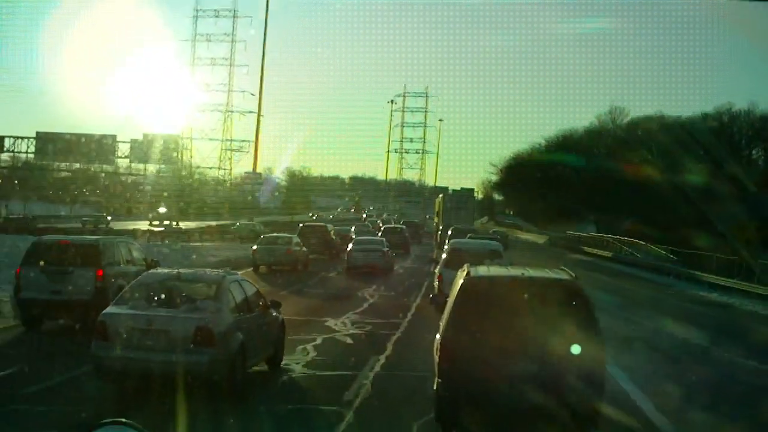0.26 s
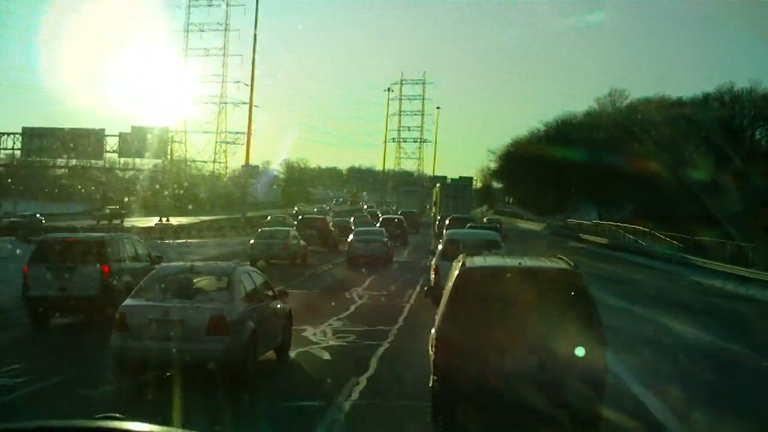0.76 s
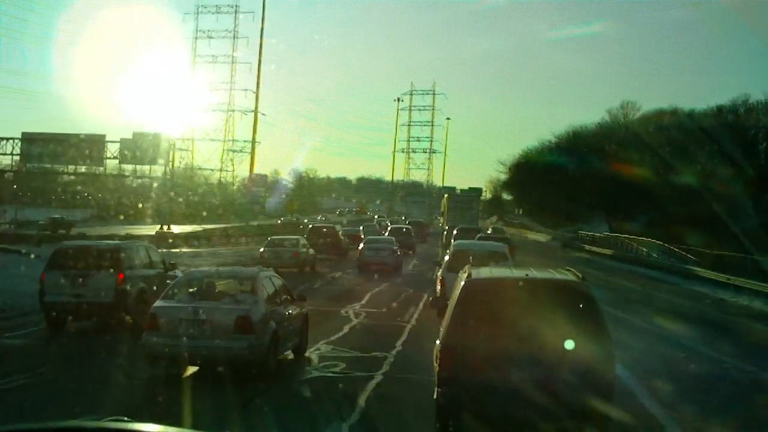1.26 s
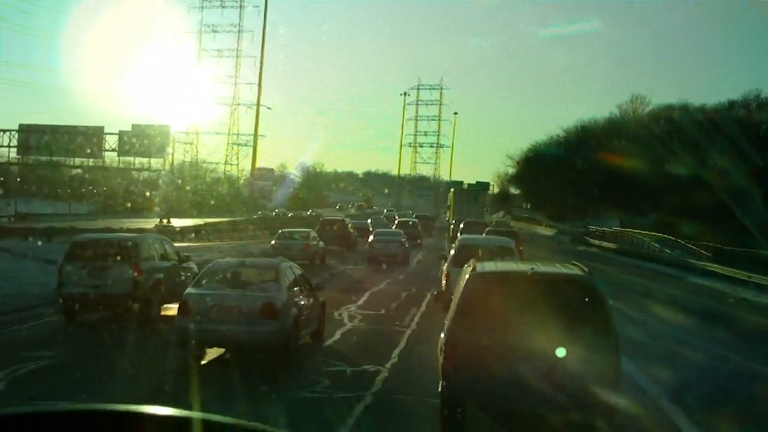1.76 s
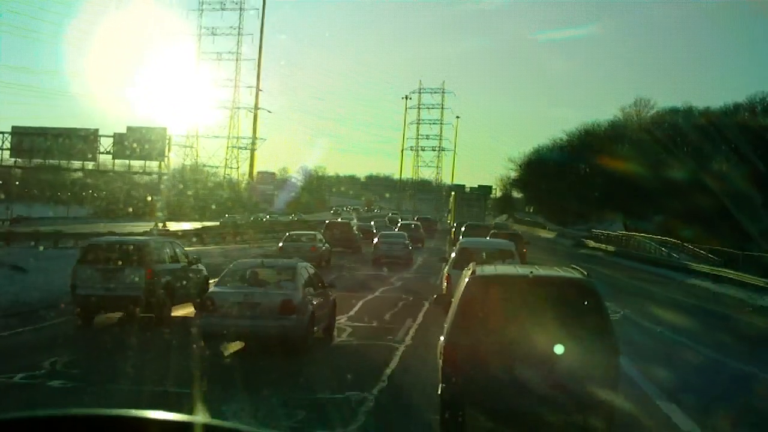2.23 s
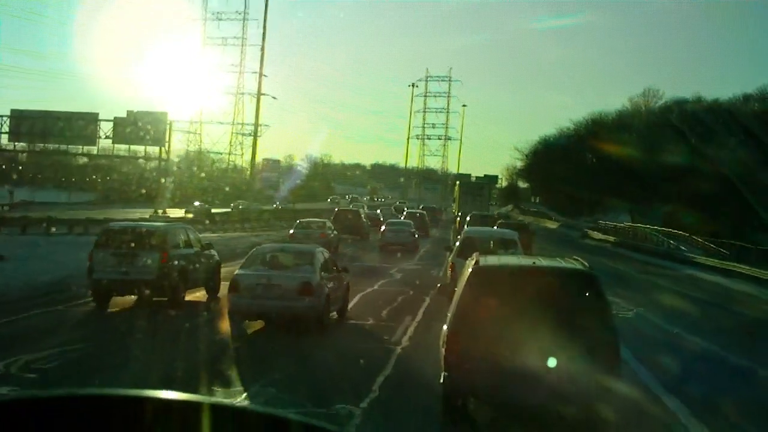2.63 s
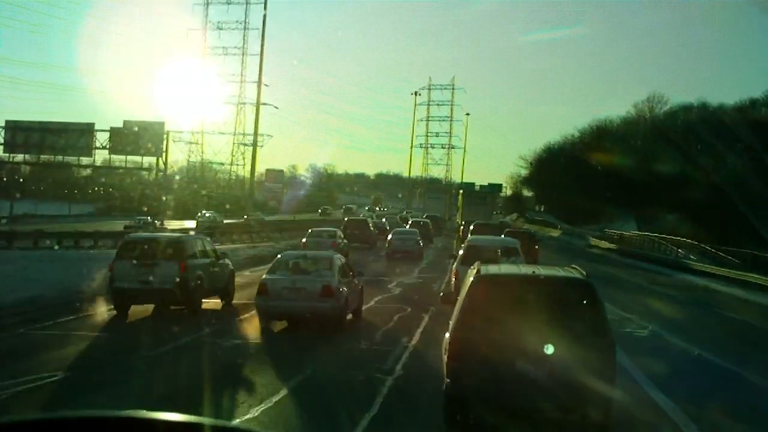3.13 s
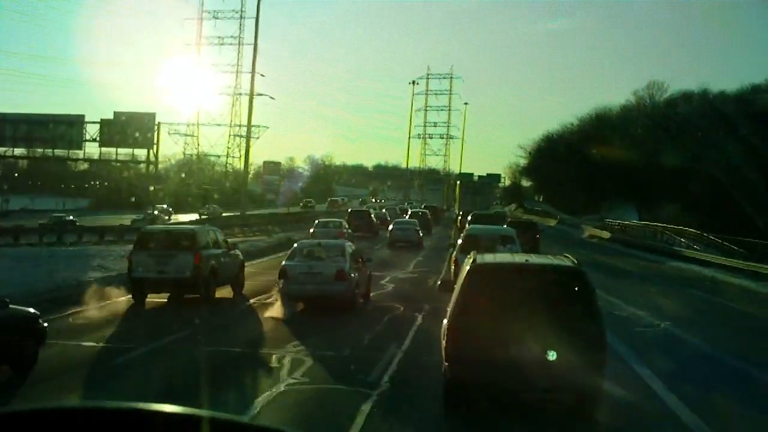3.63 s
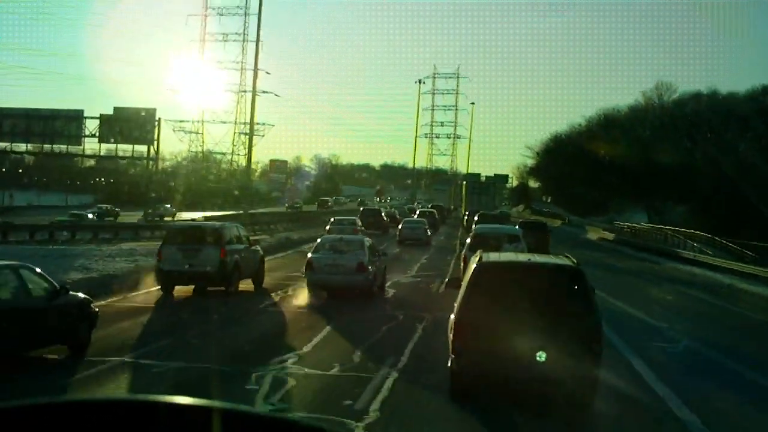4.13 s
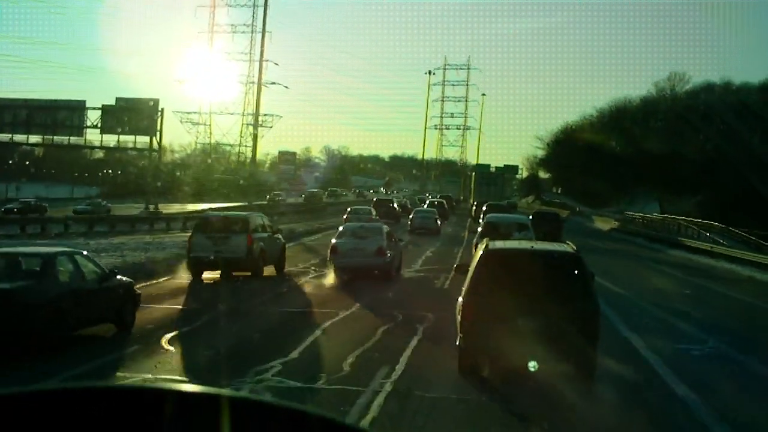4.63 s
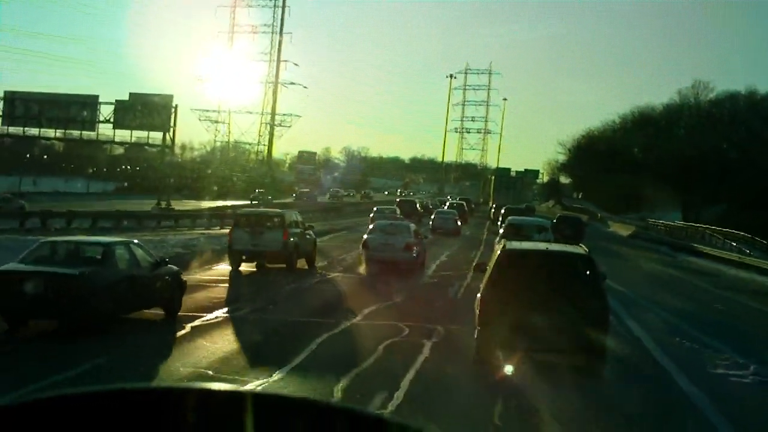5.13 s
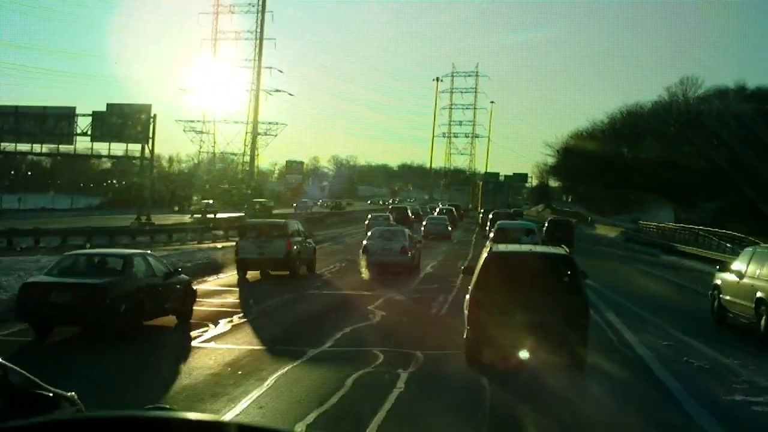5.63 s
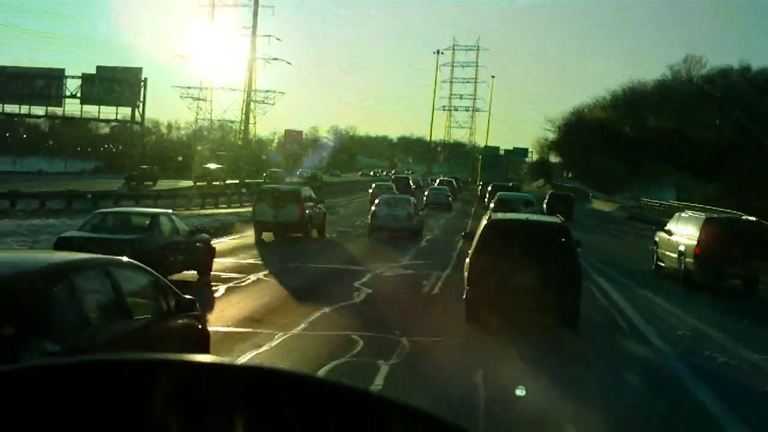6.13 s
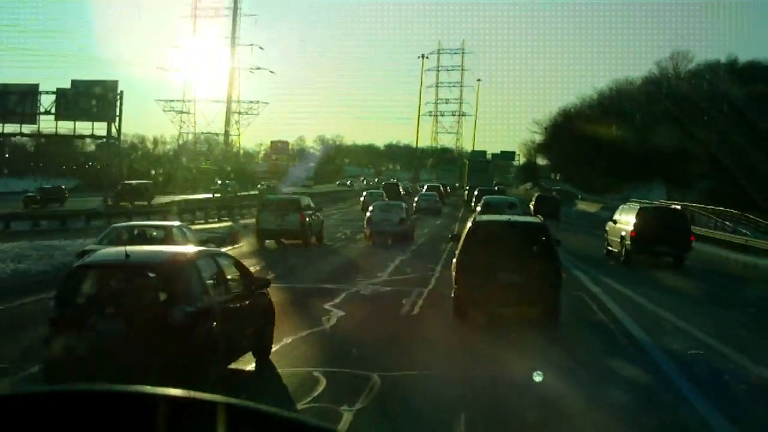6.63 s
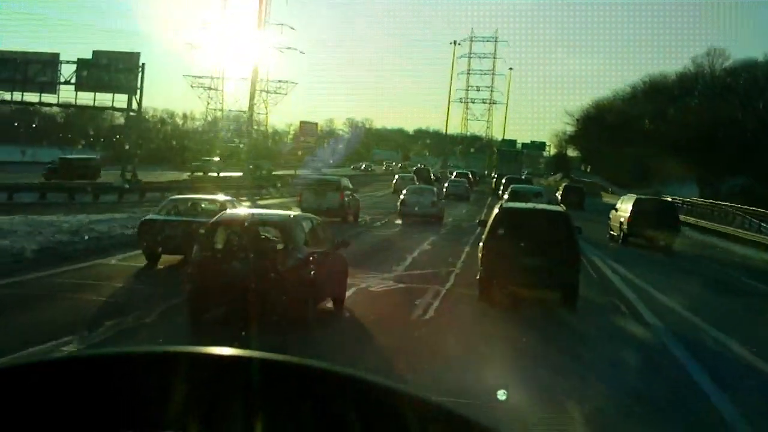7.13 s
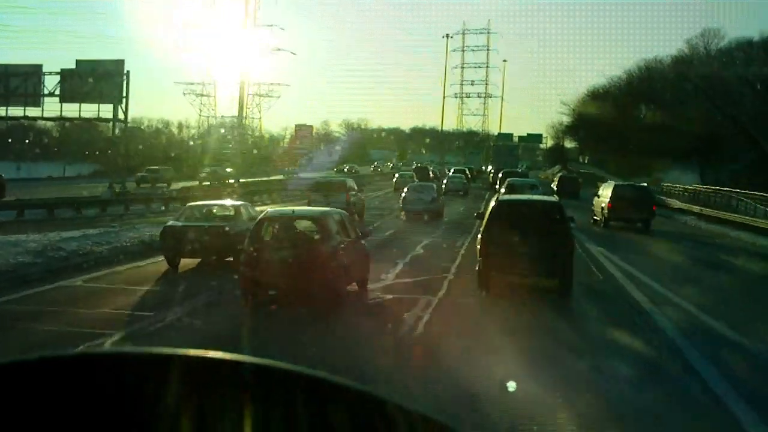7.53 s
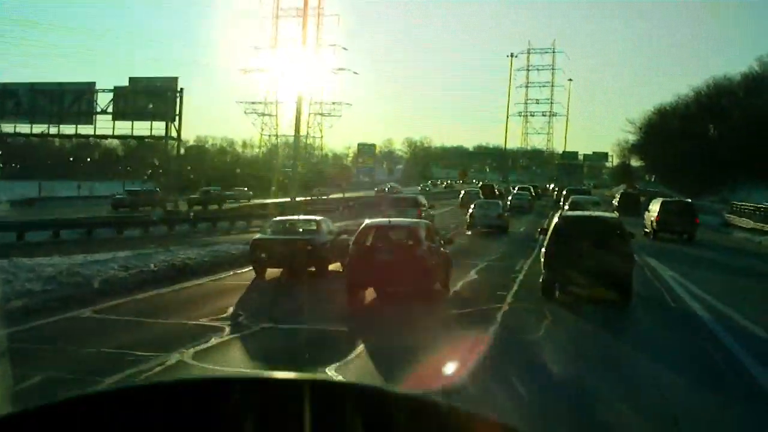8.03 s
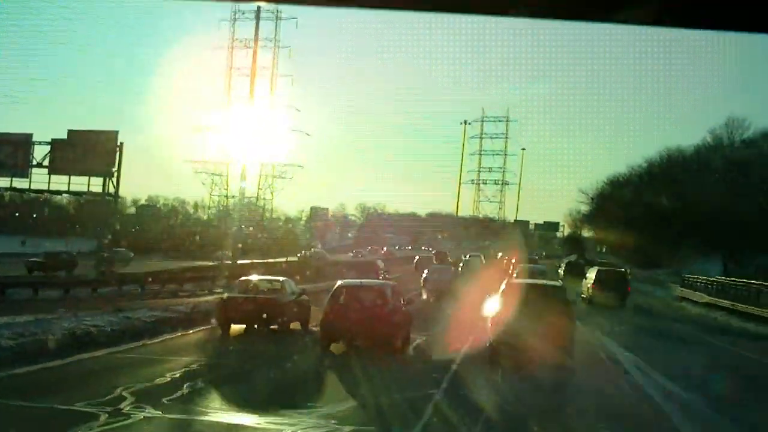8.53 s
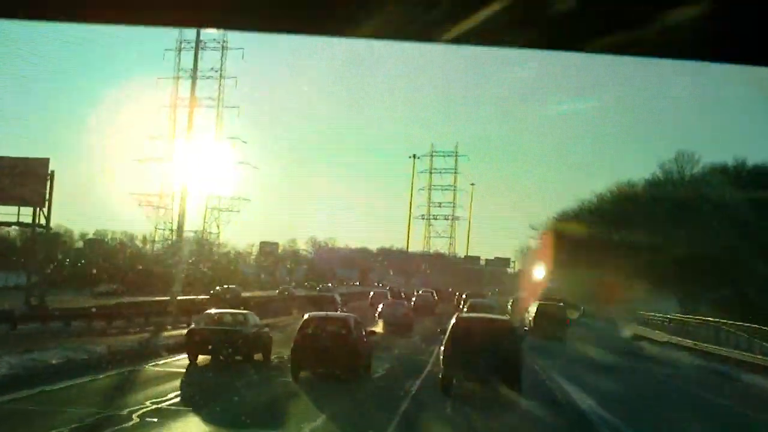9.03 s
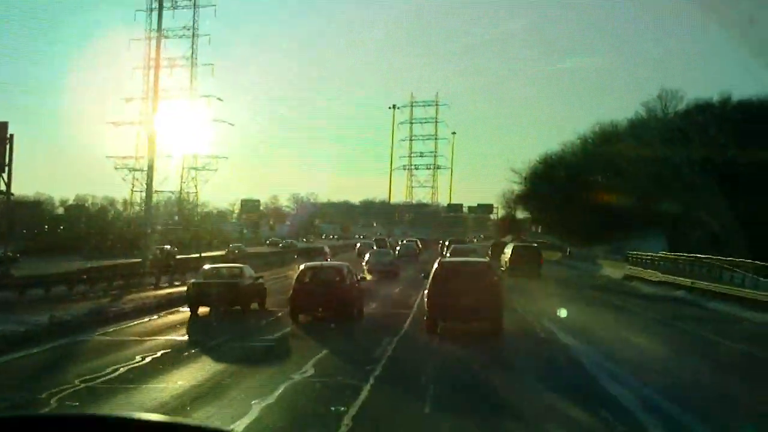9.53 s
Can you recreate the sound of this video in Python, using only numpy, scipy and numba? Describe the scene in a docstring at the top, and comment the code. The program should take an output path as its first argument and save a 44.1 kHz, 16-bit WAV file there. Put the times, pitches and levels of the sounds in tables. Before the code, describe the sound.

A heavy engine drones and clatters from within the cab, its pitch sagging for three seconds before surging up under load with a brief sizzle. It holds, drops back, then growls upward again in two pulls. Deep tyre rumble and cab shake underlie everything; small buzzes and ticks fizz on top, and bass peaks make the microphone choke and crackle.

```python
"""Inside the cab of a truck in slow highway traffic: the engine coasts down, pulls away, eases off and pulls again.
Pure tones locked to the crankshaft boom in the cab. Pulses and noise, shaped by spectra and narrow peaks, make
the exhaust drone and the clatter of the block; filtered noise makes the rumbling tyres, ticks, buzz and sizzle.
A gear whines briefly. The bass swings so far that the microphone blocks on its peaks and crackles."""
import sys
import numpy as np
from scipy import signal
from scipy.fft import rfft, irfft, next_fast_len
from scipy.io import wavfile
from numba import njit

SR = 44100
rng = np.random.default_rng(int(sys.argv[2]) if len(sys.argv) > 2 else 0)


def int16_out(signal):
    """Quantize to a 16-bit WAV file."""
    q = np.round(np.clip(np.atleast_2d(signal).T, -1, 1) * 32767)
    wavfile.write(sys.argv[1], SR, q.astype(np.int16))


N = 430857
TIME = np.arange(N) / SR

# Levels in the tables are relative: trims and slow random changes in the functions come on top.
# Tyre rumble, louder as the truck gathers speed. Each row: time in seconds, level in dB.
ROAD_LEVEL = [(0, -24.5), (1.8, -23.5), (2.7, -31), (3.6, -19), (5, -23), (6.3, -22.5), (7.1, -16),
              (8.2, -18.5), (9.77, -18.5)]
# Smooth spectra of the tyres, the exhaust drone, the block's clatter and the dry ticks.
# Each row: frequency in Hz, level in dB per Hz.
RUMBLE_SPECTRUM = [(12, -22.5), (22, -8.5), (45, -7.5), (70, -1), (92, -1.5), (125, -5), (170, -15.5),
                   (300, -31.5), (700, -42.5)]
DRONE_SPECTRUM = [(40, -10.5), (90, -3.5), (170, 0), (240, 1), (300, 2), (350, 0), (400, 2), (480, -5.5),
                  (600, -11.5), (900, -13), (2000, -34)]
CLATTER_SPECTRUM = [(200, -20.5), (450, -2.5), (700, -5), (1050, -8.5), (1250, -13.5), (1600, -14),
                    (2200, -19.5), (3200, -25), (4500, -30), (6000, -37), (8000, -34), (10000, -33.5),
                    (12300, -26.5), (15500, -38)]
TICK_SPECTRUM = [(1500, -8), (2700, -2), (4000, -4), (6000, -16.5), (8000, -14.5), (10000, -19),
                 (14000, -34)]
# Narrow peaks in the clatter and in the hiss that rises and falls with it, then those of the ticks.
# Each row: frequency in Hz, width in Hz, height above the smooth spectrum in dB.
CLATTER_PEAKS = [(765, 26, 7), (808.5, 58.5, 11), (906, 39, 7.5), (992, 80, 4.5), (1600, 94, 2.5),
                 (4380, 72, 6.5), (4700, 77, 8.5), (5110, 230, 7.5), (6880, 120, 9.5), (7340, 150, 6.5),
                 (11150, 134, 13.5), (12060, 110, 6), (12400, 250, 1.5), (13000, 320, 5)]
TICK_PEAKS = [(4060, 310, 5.5), (7900, 510, 8.5)]
# The cylinders in firing order. Each row: strength in dB, delay in the exhaust pipe in seconds.
CYLINDERS = [(4.5, 0.00027), (-7.5, .0014), (1.5, 0.00044), (-7.5, .0018), (4.5, 0.00038), (-5, .0022),
             (1, .0013), (3, 0.000094)]
# Speed of the crankshaft. Each row: time in seconds, turns per second.
CRANK_SPEED = [(0, 30.6), (.3, 31), (.9, 27.9), (1.25, 27.1), (1.75, 25.1), (2.35, 21.2), (2.8, 17.1),
               (3.1, 18), (3.55, 31), (3.75, 36.4), (3.95, 38.2), (4.25, 35.7), (4.8, 38.3), (5.4, 40.8),
               (6.0, 34.6), (6.58, 28.8), (6.9, 32.7), (7.2, 30.2), (7.5, 33.6), (7.9, 35.1), (8.3, 39.8),
               (8.55, 38), (8.87, 42.5), (9.77, 37.8)]
# How hard the engine shakes the cab, about once a turn. Each row: time in seconds, level in dB.
SHAKE_LEVEL = [(0, -22.5), (.55, -22), (.72, -32), (.95, -20.5), (1.13, -31), (1.4, -20), (1.9, -31.5),
               (2.35, -28.5), (3.0, -35.5), (3.9, -20.5), (4.25, -27), (4.9, -24), (6.3, -20.5), (7.2, -32),
               (7.7, -20), (8.55, -20), (9.0, -32), (9.77, -24)]
# Dry ticks while the engine coasts. Each row: time in seconds, strength in dB.
TICK_TIMES = [(0.0862, -33), (0.115, -29.5), (0.16, -29), (0.2309, -30), (0.4309, -30), (0.503, -29),
              (0.5681, -37), (0.8719, -26), (0.923, -37), (0.964, -33), (1.0076, -29), (1.2451, -32),
              (1.284, -28), (1.3657, -30), (1.403, -31), (1.444, -32), (1.5254, -44), (1.604, -35),
              (1.6667, -27.5), (1.705, -26.5), (1.7444, -30), (1.792, -32), (1.9634, -34), (2.0055, -32),
              (2.0343, -35), (2.0928, -30), (2.1224, -31.5), (2.2828, -37), (2.4203, -30.5), (2.5486, -36),
              (2.745, -31), (2.799, -30), (2.8594, -33), (2.9292, -30.5)]
# Presses of the pedal. Each row: start in seconds, end in seconds, release in seconds,
# clatter lift in dB, drone lift in dB.
PEDAL_PRESSES = [(3.033, 3.396, 0.082, 7, 4), (3.536, 3.8, 0.34, 4.5, 1.5), (3.907, 5.537, 0.4, 6, 3.2),
                 (6.534, 7.051, 0.67, 6.5, 6), (7.388, 9.28, 0.5, 4.5, 6.5)]
# Brief surges and lulls of the engine's noise.
# Each row: centre in seconds, length in seconds, clatter change in dB, drone change in dB.
SURGES = [(0.28, 0.056, 2.5, 5.5), (0.792, 0.093, 1.5, 1), (1.593, 0.15, 4.5, 5), (2.38, .11, 4, 6.5),
          (3.2, 0.11, 3.5, 1.5), (3.52, 0.046, -6, -13), (3.558, 0.062, 11.5, 15), (3.697, 0.017, 7.5, 6),
          (3.77, .06, 2, 0), (4.348, .35, 2.5, -0.5), (4.714, 0.35, 0, 3), (5.167, 0.23, 0.5, 2.5),
          (6.712, 0.052, 3, -4.5), (6.923, 0.029, 1, 5), (7.55, 0.3, 2, 0), (7.706, 0.11, -1, -2.5),
          (8.207, 0.075, 2.5, 7.5), (8.329, 0.045, -5, -2), (8.452, 0.14, 2, 3), (8.923, 0.058, -5, -4),
          (9.262, 0.07, 2, 1.5)]
# Tones that boom in the cab. Each row: order in cycles per crankshaft turn, level while coasting in dB,
# share of the pedal's drone lift.
BOOM_ORDERS = [(2, -31.5, 0.38), (3, -32, 1), (4, -33, .8), (5, -38.5, 1.0), (6, -42.5, 0.99)]
# Moments when one of these tones swells. Each row: centre in seconds, length in seconds,
# order in cycles per turn, lift in dB.
BOOM_SWELLS = [(0.808, .4, 3, 8.5), (1.62, 0.48, 4, 6.5), (1.902, 0.51, 2, 6.5), (1.85, 0.49, 5, 5),
               (2.373, .15, 4, 8.5), (2.92, 0.2, 2, 9.5), (3.359, 0.19, 4, 8), (3.61, 0.13, 3, 8),
               (3.781, 0.12, 4, 17.5), (4.503, 0.7, 4, 9.5), (5.15, .5, 4, 3.5), (5.19, 0.48, 5, 10),
               (5.45, .9, 3, 4), (5.1, .7, 6, 4.5), (6.838, 0.32, 4, 4), (7.106, 0.79, 2, 13),
               (7.595, 0.66, 3, 5), (7.746, .45, 6, 10.5), (8.219, .3, 6, 7), (8.25, 0.35, 4, 3.5),
               (8.698, 0.14, 5, 7.5), (8.926, 0.49, 2, 13), (8.95, .7, 5, 4), (9.12, 0.35, 3, 4)]
# Higher tones that growl under load. Each row: order in cycles per turn, level in dB.
GROWL_ORDERS = [(4.5, -9.5), (5.5, -14), (6.5, -13.5), (7, -7.5), (8, -13), (10, -12.5), (10.5, -13)]
# How the cab responds to an engine tone. Each row: frequency in Hz, gain in dB.
CAB_GAIN = [(35, -3.5), (55, -1), (75, -4), (86, 0), (102, 2), (122, -1.5), (146, -1), (165, -5), (205, 1),
            (245, -1), (330, -4), (385, 2.5), (430, -8)]
# Thin sizzle as the engine takes up the load. Each row: centre in seconds, length in seconds, level in dB.
SPURTS = [(3.18, 0.16, -49), (3.626, 0.22, -48.5)]
# A thin, faint squeal, perhaps the brakes. Each row: centre in seconds, length in seconds, level in dB.
SQUEALS = [(.75, .3, -61.5), (5.8, 0.45, -58)]

# With the pedal up and no surge, engine speed alone sets the basic levels of clatter and drone.
COAST_TURNS_PER_S, COAST_CLATTER_DB, COAST_DRONE_DB = 33.6, -36, -33.5
CLATTER_DB_PER_OCTAVE, DRONE_DB_PER_OCTAVE = 5, 4.5
PRESS_ATTACK_S = 0.098
# Growl against the drone with the pedal up, and the share of the clatter lift added to it.
GROWL_COAST_DB, GROWL_SHARE = -2.5, .65
# The whine's pitch at the start and its steady fall, its level, and its fade.
WHINE_HZ, WHINE_SAG_HZ_PER_S, WHINE_DB = 967, 145, -45.5
WHINE_FADE_START_S, WHINE_FADE_S = 0.88, 0.52
# Buzz with the pedal up at a given shake level, and dB gained per dB of shake.
BUZZ_DB, BUZZ_AT_SHAKE_DB, BUZZ_GROWTH = -47.5, -20, 1.0
SPURT_FLICKER_DB = 3
MIC_CORNER_HZ, CUTOFF_HZ = 200, 15800


def from_db(db):
    """Turn decibels into a plain gain."""
    return 10 ** (np.asarray(db) / 20)


def rms_one(x):
    """Scale a sound to an average (rms) level of 1."""
    return x / np.sqrt(np.mean(x ** 2) + 1e-20)


def in_time(rows):
    """Join the points of a curve with straight lines, one value per sample."""
    times, values = np.transpose(rows)
    return np.interp(TIME, times, values)


def noise():
    """White noise: all pitches equally strong."""
    return rng.standard_normal(N)


def drift(rate_hz):
    """Slow random wandering, drawn every few samples and joined up."""
    step, size = 40, 16384
    hz = np.arange(size // 2 + 1) * SR / step / size
    smoothing = 1 / (1 + (hz / rate_hz) ** 2) ** 2
    slow = irfft(rfft(rng.standard_normal(size)) * smoothing, size)
    return np.interp(np.arange(N) / step, np.arange(size), rms_one(slow))


def bump(centre_s, length_s):
    """A smooth rise and fall of height 1, length_s wide at half height."""
    return np.exp2(-np.minimum((2 * (TIME - centre_s) / length_s) ** 2, 60))


def colour(x, spectrum, peaks=()):
    """Give a sound a smooth spectrum with narrow peaks on top, at rms 1."""
    size = next_fast_len(N + 8192)
    hz = np.maximum(np.arange(size // 2 + 1) * SR / size, 1)
    points, levels = np.transpose(spectrum)
    db = np.interp(np.log(hz), np.log(points), levels)
    for centre, width, lift in peaks:
        db = db + lift / (1 + (2 * (hz - centre) / width) ** 2)
    # Fade out beyond both ends of the spectrum.
    ends = np.minimum(hz / points[0], 1) * np.minimum(points[-1] / hz, 1)
    return rms_one(irfft(rfft(x, size) * from_db(db) * ends ** 2, size)[:N])


def resonate(x, hz, width_hz):
    """Ring one resonance, with gain 1 at its peak."""
    r = np.exp(-np.pi * width_hz / SR)
    feedback = [1, -2 * r * np.cos(2 * np.pi * hz / SR), r * r]
    return signal.lfilter(np.array([1, 0, -1]) * (1 - r * r) / 2, feedback, x)


def resonate_twice(x, hz, width_hz):
    """Pass a sound through the same resonance twice, for a narrower band."""
    return resonate(resonate(x, hz, width_hz), hz, width_hz)


def die_away(hits, decay_s):
    """Turn each hit into a level that falls off exponentially."""
    return signal.lfilter([1], [1, -np.exp(-1 / (decay_s * SR))], hits)


def tone(turns, order, db):
    """A sine with order cycles per turn, at the given rms level."""
    return from_db(db) * np.sqrt(2) * np.sin(2 * np.pi * (order * turns + rng.random()))


def cab_response(hz):
    """Gain of the cab in dB for a tone of this pitch: its resonances favour some pitches."""
    points, db = np.transpose(CAB_GAIN)
    return np.interp(np.log(hz), np.log(points), db)


def heave():
    """The cab's air heaves on the springs: slow random pressure."""
    return from_db(-43) * drift(20)


def tyre_rumble():
    """Tyres on the road: noise with a low spectrum that follows the road level."""
    return from_db(in_time(ROAD_LEVEL) - 4.5) * colour(noise(), RUMBLE_SPECTRUM)


def sizzle(spurts, low_hz, high_hz, width_hz, high_db):
    """Noise in two narrow resonances, coming in flickering spurts."""
    level = sum(from_db(db) * bump(centre_s, length_s) for centre_s, length_s, db in spurts)
    flicker = from_db(SPURT_FLICKER_DB * drift(34))
    air = noise()
    low = resonate_twice(air, low_hz, width_hz)
    high = resonate_twice(air, high_hz, width_hz)
    return level * flicker * rms_one(low + from_db(high_db) * high)


def ticks(decay_s, level_db):
    """Each dry tick is a fizz of noise that dies away within milliseconds."""
    times, db = np.transpose(TICK_TIMES)
    hits = np.zeros(N)
    hits[np.clip((times * SR).astype(int), 0, N - 1)] = from_db(db + level_db)
    # The tiny offset keeps the decay from sinking to extremely small numbers.
    return die_away(hits + 1e-18, decay_s) * colour(noise(), TICK_SPECTRUM, TICK_PEAKS)


def buzz(turns, shake_db, lift_db, sharpness, rebound_db, uneven_db, damping):
    """Fizz flares once a turn and on the rebound half a turn later; it grows with the shake, eases under load."""
    db = BUZZ_DB + BUZZ_GROWTH * (shake_db - BUZZ_AT_SHAKE_DB) - damping * lift_db
    swing = sharpness * np.cos(2 * np.pi * turns)
    crests = np.exp(swing) + from_db(rebound_db) * np.exp(-swing)
    crests = crests * from_db(uneven_db * drift(24.4))
    return from_db(db) * rms_one(crests) * colour(noise(), TICK_SPECTRUM, TICK_PEAKS)


def whine(waver):
    """A gear mesh sings as the truck slows: a sine that sinks, wavers and fades."""
    hz = (WHINE_HZ - WHINE_SAG_HZ_PER_S * TIME) * (1 + waver * drift(30))
    fade = np.clip(1 - (TIME - WHINE_FADE_START_S) / WHINE_FADE_S, 0, 1)
    return fade * tone(np.cumsum(hz) / SR, 1, WHINE_DB + 2 * drift(17))


def pedal():
    """Lift of clatter and drone in dB: each press rises quickly, holds and lets go."""
    lift = np.zeros((2, N))
    for start, end, release_s, *lifts_db in PEDAL_PRESSES:
        rise = (TIME - start) / PRESS_ATTACK_S
        fall = 1 - (TIME - end) / release_s
        held = np.clip(np.minimum(rise, fall), 0, 1)
        lift = np.maximum(lift, np.outer(lifts_db, held))
    return lift


def effort(speed, lift_db, clatter_waver_db, drone_waver_db):
    """Levels of clatter and drone from engine speed, pedal, surges and a shared unsteadiness."""
    octaves, unsteady = np.log2(speed / COAST_TURNS_PER_S), drift(37)
    surge_db = sum(np.outer(db, bump(centre_s, length_s)) for centre_s, length_s, *db in SURGES)
    clatter_db = COAST_CLATTER_DB + CLATTER_DB_PER_OCTAVE * octaves + clatter_waver_db * unsteady
    drone_db = COAST_DRONE_DB + DRONE_DB_PER_OCTAVE * octaves + drone_waver_db * unsteady
    return lift_db + surge_db + [clatter_db, drone_db]


def firings(turns, chance_db, jitter_s):
    """One kick per firing, eight in two turns; cylinders differ in strength and delay, and so does each burn."""
    at = np.flatnonzero(np.diff(np.floor(turns * len(CYLINDERS) / 2)))
    own_db, pipe_s = np.array(CYLINDERS)[np.arange(len(at)) % len(CYLINDERS)].T
    chance = rng.standard_normal((len(at), 2))
    late = ((pipe_s + chance[:, 1] * jitter_s) * SR).astype(int)
    # Kicks further apart are made stronger, so that the average power does not depend on speed.
    strength = from_db(own_db + chance_db * chance[:, 0]) * np.sqrt(np.gradient(at))
    kicks = np.zeros(N)
    kicks[np.clip(at + late, 0, N - 1)] = strength
    return kicks


def knock(clatter_db, hz, width_hz, growth, full_db):
    """Hard combustion rings the block near one pitch; it grows faster with load than the clatter does."""
    ringing = rms_one(resonate_twice(noise(), hz, width_hz))
    # It is at its full level once the clatter level reaches -28 dB.
    return from_db(full_db + growth * np.minimum(clatter_db + 28.0, 0)) * ringing


def clatter(kicks, burst_s, steady, flutter_db):
    """Each firing sets off a short burst of noise over the steady wash of the running gear."""
    bursts = rms_one(die_away(kicks, burst_s))
    force = (steady + bursts) * from_db(flutter_db * drift(60))
    return colour(force * noise(), CLATTER_SPECTRUM, CLATTER_PEAKS)


def growl(turns, speed, waver_db):
    """The repeating firing pattern leaves clean whole and half orders above the lowest boom."""
    out = 0
    for order, level_db in GROWL_ORDERS:
        db = level_db + cab_response(order * speed) + waver_db * drift(6.4)
        out = out + tone(turns, order, db)
    return out


def drone(kicks, pulse_db, flow_db):
    """Exhaust pulses and turbulent flow, heard through the cab's panels."""
    pulses = from_db(pulse_db) * colour(kicks, DRONE_SPECTRUM)
    return pulses + from_db(flow_db) * colour(noise(), DRONE_SPECTRUM)


def boom(turns, speed, lift_db, waver_db):
    """Low orders grow with the pedal and boom as they sweep through the cab's resonances."""
    out = 0
    for order, coast_db, share in BOOM_ORDERS:
        db = coast_db + share * lift_db + cab_response(order * speed)
        for centre_s, length_s, swelling_order, swell_db in BOOM_SWELLS:
            if round(swelling_order) == round(order):
                db = db + swell_db * bump(centre_s, length_s)
        out = out + tone(turns, round(order), db + waver_db * drift(7.4))
    return out


def engine(turns, speed, shake_db, lift_db):
    """Crankshaft and firings drive the cab shake, boom, drone, growl, clatter and knock."""
    clatter_db, drone_db = effort(speed, lift_db, clatter_waver_db=-0.01, drone_waver_db=1.08)
    kicks = firings(turns, chance_db=3.6, jitter_s=.0001)
    growl_db = drone_db + GROWL_COAST_DB + GROWL_SHARE * lift_db[0]
    out = tone(turns, 0.98, shake_db - 2.5)  # the cab shake
    out += boom(turns, speed, lift_db[1], waver_db=1.8)
    out += from_db(drone_db) * drone(kicks, pulse_db=-3.5, flow_db=-1.5)
    out += from_db(growl_db) * growl(turns, speed, waver_db=2.5)
    out += from_db(clatter_db + 1.5) * clatter(kicks, burst_s=0.0025, steady=2.07, flutter_db=1.59)
    out += knock(clatter_db, hz=960, width_hz=220, growth=3.15, full_db=-32.5)
    return out


def scene():
    """Add up the heaving air, the road, the dry ticks, buzz, sizzle and squeal, the gear and the engine."""
    speed = in_time(CRANK_SPEED)
    turns = np.cumsum(speed) / SR
    shake_db = in_time(SHAKE_LEVEL)
    lift_db = pedal()
    background = heave() + tyre_rumble()
    small_sounds = sizzle(SQUEALS, low_hz=5020, high_hz=6930, width_hz=190, high_db=-4.0)
    small_sounds += sizzle(SPURTS, low_hz=4250, high_hz=7800, width_hz=280, high_db=-5.5)
    small_sounds += ticks(decay_s=0.0017, level_db=-3.5)
    small_sounds += buzz(turns, shake_db, lift_db[0], sharpness=22.0, rebound_db=0, uneven_db=3.0, damping=0.85)
    out = background + small_sounds + whine(waver=0.0011) + engine(turns, speed, shake_db, lift_db)
    return out[None]


@njit
def saturate(pressure, ceiling, recharge, settle):
    """Pressure beyond the ceiling is lost; it also shifts the bias, which ends the overload early."""
    lost, blocked, bias = np.zeros(len(pressure)), np.zeros(len(pressure)), 0.0
    for i in range(len(pressure)):
        level = pressure[i] - bias
        excess = level - min(max(level, -ceiling), ceiling)
        lost[i] = bias + excess
        blocked[i] = excess != 0
        bias += recharge * excess - settle * bias
    return lost, blocked


def blocking_microphone(x, ceiling, recharge_s, settle_s, ring_db):
    """The capsule overloads ahead of its bass cut; sound dies away, then snaps back with a short ring."""
    cut = [1, -np.exp(-2 * np.pi * MIC_CORNER_HZ / SR)]
    leak = [1, -np.exp(-2 * np.pi * 4 / SR)]  # the bass cut levels off below 4 Hz
    # Undo the bass cut to get the pressure at the capsule; what is lost there passes through the cut.
    pressure = signal.lfilter(cut, leak, x)
    lost, blocked = saturate(pressure, ceiling, 1 / (recharge_s * SR), 1 / (settle_s * SR))
    release = np.maximum(-np.diff(blocked, prepend=0), 0) * x + 1e-18
    ring = resonate(release, 4070, 510) + .5 * resonate(release, 7760, 440)
    return x - signal.lfilter(leak, cut, lost) + from_db(ring_db) * ring


def record(dry):
    """Overload at the microphone, then the top is cut."""
    heard = blocking_microphone(dry[0], ceiling=.85, recharge_s=0.0033, settle_s=0.014, ring_db=7.0)[None]
    top_cut = signal.ellip(12, .1, 90, CUTOFF_HZ, fs=SR, output="sos")
    return signal.sosfilt(top_cut, heard)


dry = scene()
out = record(dry)
int16_out(out)
```